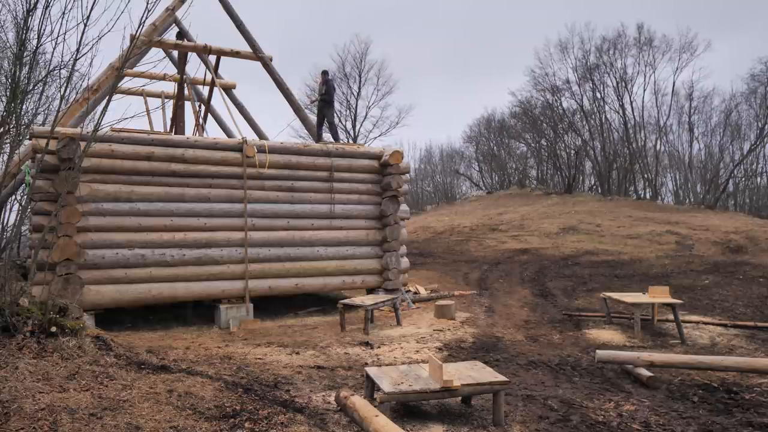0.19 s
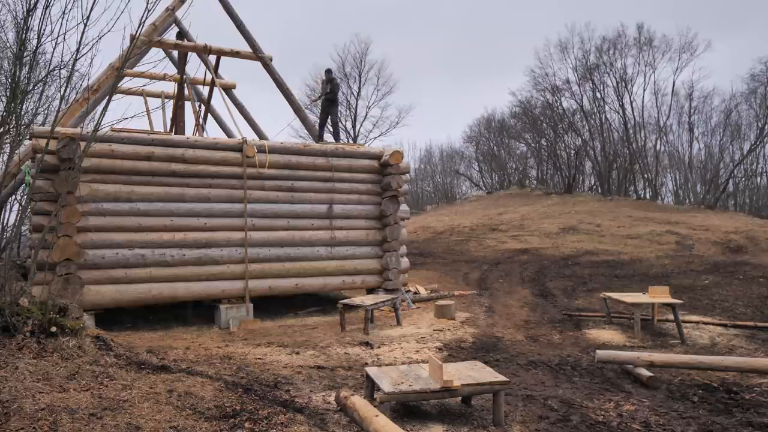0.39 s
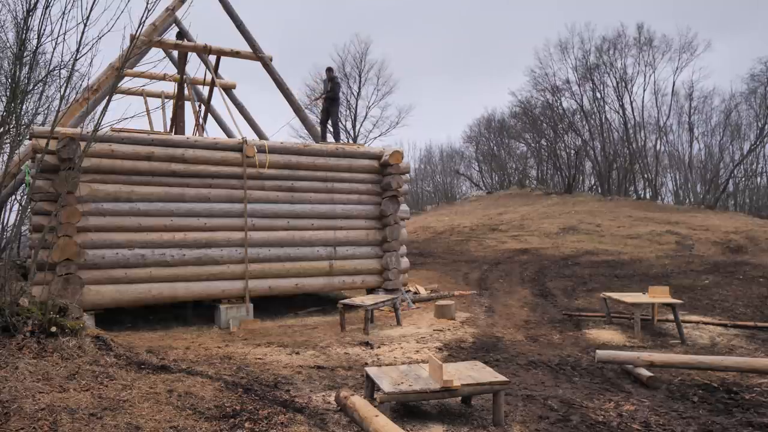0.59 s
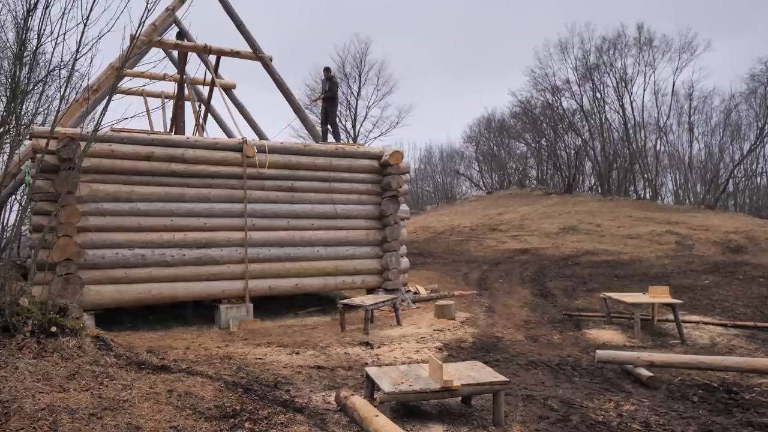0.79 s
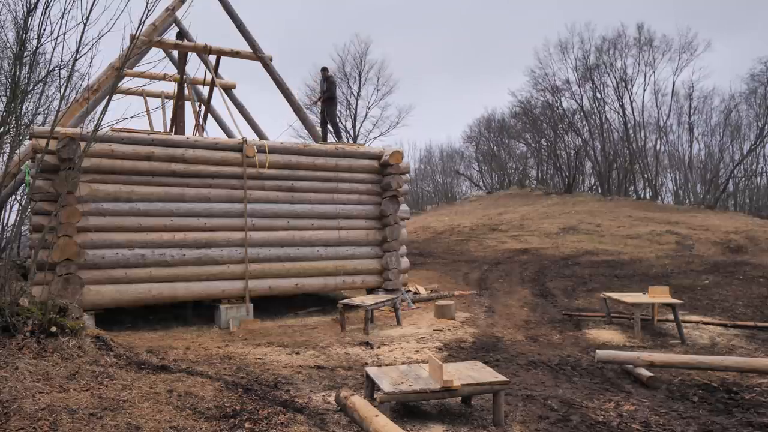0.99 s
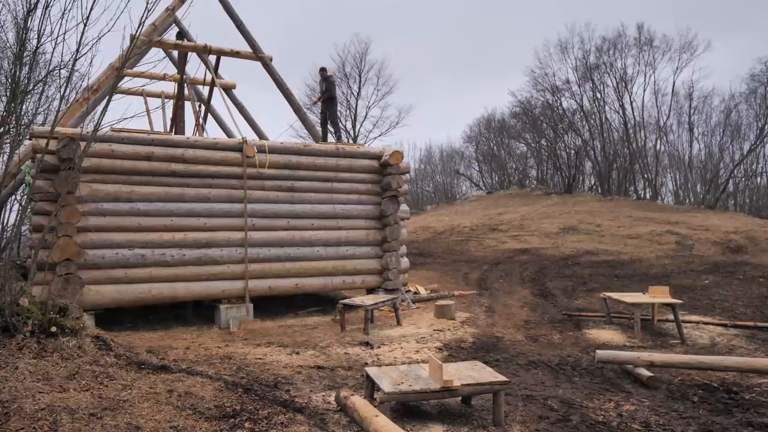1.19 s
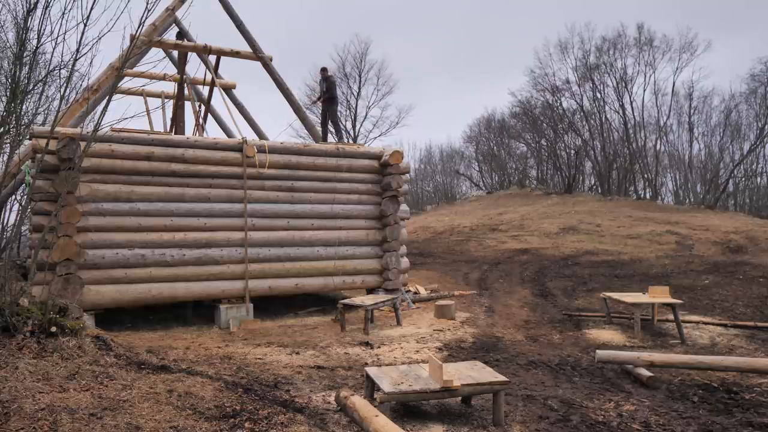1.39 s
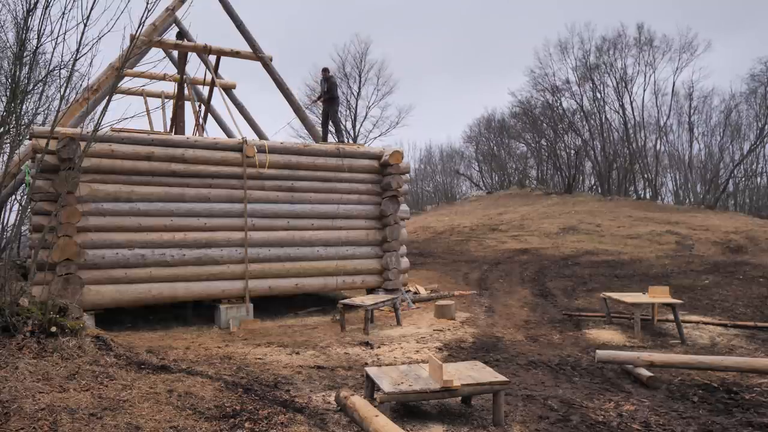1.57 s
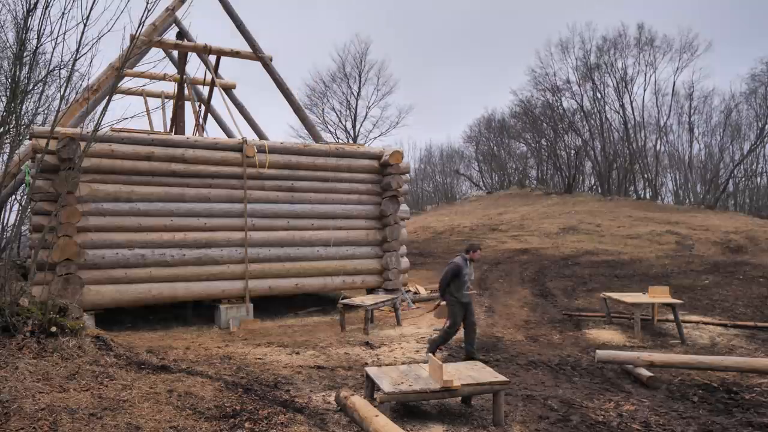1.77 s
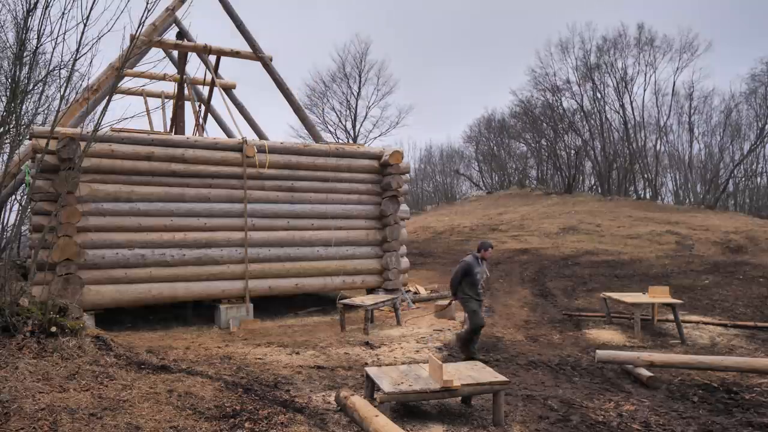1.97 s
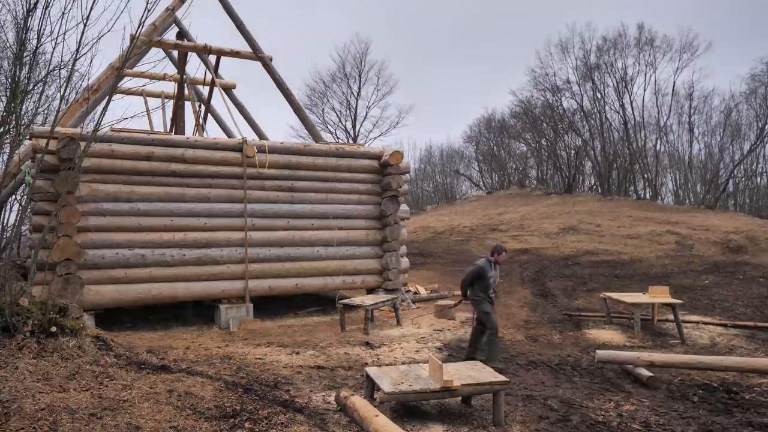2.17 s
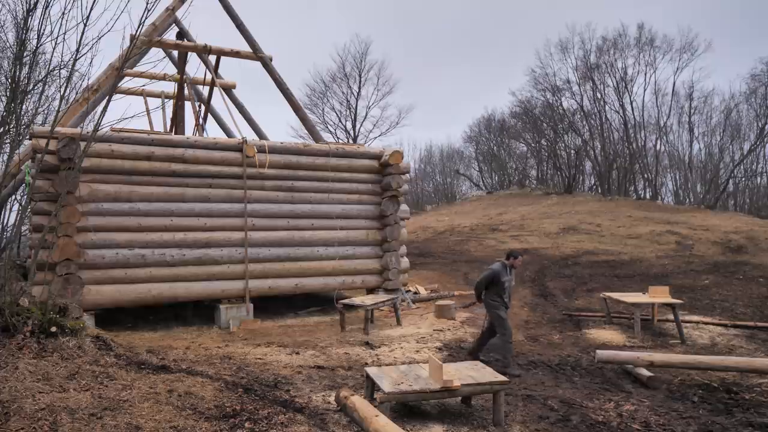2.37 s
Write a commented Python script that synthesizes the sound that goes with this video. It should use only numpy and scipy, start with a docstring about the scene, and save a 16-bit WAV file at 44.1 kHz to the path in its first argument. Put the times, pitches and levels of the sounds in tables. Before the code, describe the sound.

Metal tools dropped and dragged across a wooden workbench outside, sharp clinks fading into small scuffs

```python
"""Steel tools on a wooden bench

Outdoors by a log building, tools are dragged, dropped and knocked about; then sparse ticks and a step.
Noise-driven modes make wood thuds and rumbles, band-passed grains the gritty scrapes, noise bursts the ticks.
Struck modes make the wood tocks, tool clinks and thin ringing hardware; air noise and a dull echo surround them."""
import sys
import numpy as np
from scipy import signal
from scipy.fft import rfft, irfft
from scipy.io import wavfile

SR = 44100
rng = np.random.default_rng(int(sys.argv[2]) if len(sys.argv) > 2 else 0)


def log_audio(samples):
    """Write samples as a 16-bit WAV file to the path given in sys.argv[1]."""
    # one column per channel
    frames = np.atleast_2d(samples).T
    # limit to full scale, then quantise
    limited = np.clip(frames, -1, 1)
    pcm = np.round(limited * 32767).astype(np.int16)
    wavfile.write(sys.argv[1], SR, pcm)


def voltage_ratio(decibels):
    """Convert decibels (scalar or array-like) to amplitude ratios, 20 dB per decade."""
    exponent = np.asarray(decibels, float) / 20
    return 10 ** exponent


N = 110250


def unit(x):
    """Scale to rms 1."""
    return x / np.sqrt(np.mean(x ** 2))


def add(out, start_s, x):
    """Mix x in at start_s."""
    i = int(start_s * SR)
    out[i:i + len(x)] += x[:N - i]


def ring(x, hz, t60_s):
    """One decaying mode; a unit impulse rings with peak near 1."""
    pole = np.exp(2j * np.pi * hz / SR - np.log(1000) / (t60_s * SR))
    return signal.lfilter([1], [1, -pole], x).imag


def hum(x, modes):
    """Modes driven by noise of rms 1, each giving its own dB."""
    out = 0
    for hz, db, t60_s in modes:
        noise_gain = np.sqrt(4 * np.log(1000) / (t60_s * SR))
        out = out + voltage_ratio(db) * ring(x, hz, t60_s) * noise_gain
    return out


def shape(start_s, length_s, db, fall_db):
    """Quick attack, steady dB change over the length, then release."""
    attack_s, release_t60_s = 0.0006, 0.031
    t = np.arange(N) / SR - start_s
    fall = fall_db * np.clip(t / length_s, 0, 1)
    release = np.maximum(t - length_s, 0) * 60 / release_t60_s
    return np.clip(t / attack_s, 0, 1) * voltage_ratio(db - fall - release)


def grains(rate_per_s, spread_db):
    """Dense tiny impacts of uneven size, rms 1."""
    hit = rng.random(N) < rate_per_s / SR
    size_db = spread_db * np.minimum(rng.exponential(size=N), 4)
    return unit(hit * rng.standard_normal(N) * voltage_ratio(size_db))


def patches(rate_hz):
    """Gain that wanders unevenly, as a rough surface passes."""
    spread_db = 3
    k = int(N * rate_hz / SR)
    wander = np.interp(np.arange(N), np.arange(k) * N / k, rng.standard_normal(k))
    return voltage_ratio(spread_db * wander)


def band(x, lo_hz, hi_hz, like=None):
    """Band-pass, scaled so that the steady signal `like` (default x) comes out at rms 1."""
    sos = signal.butter(2, [lo_hz, min(hi_hz, SR / 2.4)], "band", fs=SR, output="sos")
    reference = signal.sosfilt(sos, x if like is None else like)
    return signal.sosfilt(sos, x) / np.std(reference)


def air():
    """Open-air background: shaped noise whose octave bands flicker a little."""
    # relative spectrum: f/Hz, density/dB per Hz
    spectrum = [(15, -59), (25, 5.5), (322, 0.5), (1240, -9), (1850, -12.5), (5150, -20), (15500, -23)]
    rms_db, flicker_db = -49, 1
    hz, out = np.arange(N // 2 + 1) * SR / N + 1, 0
    curve_hz, curve_db = np.array(spectrum).T
    tone = voltage_ratio(np.interp(np.log(hz), np.log(curve_hz), curve_db))
    for centre_hz in 30 * 2. ** np.arange(10):
        octave = np.sqrt(np.clip(1 - np.abs(np.log2(hz / centre_hz)), 0, 1))
        noise = irfft(rfft(rng.standard_normal(N)) * tone * octave, N)
        flicker = np.interp(np.arange(N), np.arange(40) * N / 39, rng.standard_normal(40))
        out = out + noise * voltage_ratio(flicker_db * flicker)
    return unit(out) * voltage_ratio(rms_db)


def scrapes():
    """Steel sliding over gritty wood: patchy grains in two bands; brief band-passed scuffs."""
    # slide breakpoints: t/s, level/dB, treble re main band/dB
    slide = [(0, -53, -31), (0.547, -56, -10), (0.553, -37.5, -4), (0.636, -45.5, 8), (0.638, -11, -3),
             (0.67, -35.5, -8), (0.713, -49, 7), (0.744, -27.5, -4.5), (0.804, -45, -7), (.835, -30.5, 7),
             (0.943, -32, 4.5), (0.957, -26, 11.5), (1.003, -16.5, -7.5), (1.022, -31, -22),
             (1.172, -37.5, -12.5), (1.299, -48.5, -20)]
    # brief scuffs: t/s, length/s, level/dB, fall over length/dB, centre f/Hz
    scuffs = [(1.231, 0.0096, -32, 5, 11000), (1.724, 0.015, -63.5, -16.5, 6260),
              (1.822, 0.052, -49, 5, 8750), (2.073, 0.035, -47, -7, 4020), (2.116, 0.068, -42, 8, 2220),
              (2.312, 0.273, -54.5, -3, 2340)]
    span = 1.9  # centre to band edge, ratio
    drive = (grains(14000, 1.5) + 0.54 * rng.standard_normal(N)) * patches(120)
    t, (s, db, treble_db) = np.arange(N) / SR, np.array(slide).T
    treble = voltage_ratio(np.interp(t, s, treble_db)) * band(drive, 4430, 14200)
    out = band(drive, 1710, 9250) + treble
    out *= voltage_ratio(np.interp(t, s, db, right=-99))
    for s, length_s, db, fall_db, hz in scuffs:
        i, j = int(s * SR), int((s + length_s) * SR) + 4000
        scuff = band(drive[i:j], hz / span, hz * span)
        add(out, i / SR, scuff * shape(s, length_s, db, fall_db)[i:j])
    return out


def wood():
    """Chattering contacts shake the bench's modes, which ring on; single knocks tock."""
    # blows and drags: t/s, length/s, level/dB, fall over length/dB, top f/Hz
    thuds = [(.005, 0.1, -41.5, -0.5, 1620), (0.112, 0.11, -31, -0.5, 830), (0.212, 0.064, -20.5, 13, 1810),
             (0.274, 0.13, -14, 36.5, 1490), (0.314, 0.21, -20.5, 18, 1510), (0.546, 0.0525, -32, -4, 2320),
             (0.634, 0.086, -17, 26, 700), (0.718, 0.066, -22.5, 6, 2050), (0.774, 0.19, -30.5, -0.5, 1530),
             (0.858, 0.048, -13.5, 18.5, 1920), (0.97, .035, -19.5, 7, 1540),
             (1.039, 0.099, -27.5, 12, 1620), (1.11, 0.45, -33.5, 49.5, 2270),
             (1.569, 0.031, -29.5, 18.5, 1720), (2.116, 0.064, -44.5, 3.5, 817)]
    # bench modes: f/Hz, level/dB, t60/s
    bench_modes = [(127.4, -9, 0.062), (261.6, -21, 0.54), (378, -16, 0.05), (770, -19.5, 0.031),
                   (1022, -23.5, 0.017)]
    # knocks, each one mode of plank, ground or bit of steel: t/s, peak/dB, f/Hz, t60/s
    tocks = [(.12, -25, 610, 0.23), (.277, -7, 913, 0.084), (.297, -11.5, 965, 0.056),
             (.551, -23.5, 1980, .035), (.860, -5, 790, 0.048), (.578, -17, 1850, .012),
             (.605, -12.5, 764, 0.061), (1.338, -17.5, 4860, 0.014), (2.09, -24.5, 624, 0.014),
             (2.097, -24.5, 235, 0.053), (2.113, -23, 428, 0.023), (.642, -20, 421.7, 0.16),
             (.726, -15, 792, 0.22), (0.97, -27.5, 100.9, 0.31)]
    broad_db, low_cut_hz = -3, 152.6
    drive, out = grains(4500, 1), np.zeros(N)

    def body(x):
        """Bench modes plus dull broadband noise."""
        return hum(x, bench_modes) + voltage_ratio(broad_db) * signal.lfilter([1], [1, -.8], x)

    steady = body(drive[:SR // 2])
    for s, length_s, db, fall_db, top_hz in thuds:
        i, j = int(s * SR), int((s + length_s) * SR) + 8000
        push = (drive * shape(s, length_s, db, fall_db))[i:j]
        add(out, s, band(body(push), low_cut_hz, top_hz, steady))
    impulse = np.r_[1., np.zeros(SR // 3)]
    for s, db, hz, t60_s in tocks:
        add(out, s, voltage_ratio(db) * ring(impulse, hz, t60_s))
    return out


def ticks():
    """Short hard ticks: a noise crack of a few ms and a weaker, longer noise tail."""
    # t/s, level/dB, centre f/Hz
    hits = [(0.1635, -26.5, 5160), (0.2169, -14, 4200), (0.3104, -24.5, 5060), (0.331, -33.5, 6000),
            (0.352, -26, 4960), (0.364, -20, 5100), (0.3879, -12.5, 4030), (0.6062, -0.5, 5500),
            (0.832, -10.5, 7370), (1.3373, -12.5, 5000), (1.5184, -34.5, 7000)]
    crack_t60_s, tail_db, tail_t60_s = .008, -21.5, 0.096
    out, t = np.zeros(N), np.arange(3000) / SR
    for (s, db, hz), hiss in zip(hits, rng.standard_normal((len(hits), 3000))):
        crack = band(hiss, hz / 1.77, hz * 1.88) * voltage_ratio(-60 * t / crack_t60_s)
        tail = band(hiss[::-1], hz / 1.35, hz * 1.62) * voltage_ratio(tail_db - 60 * t / tail_t60_s)
        add(out, s, voltage_ratio(db) * (.5 * crack + tail))
    return out


def clinks():
    """Each blow wakes the steel tool's modes a little differently, until a touch mutes them."""
    # tool modes: f/Hz, level/dB, t60/s
    tool_modes = [(4340, -16, .2), (4860, -3, .08), (7365, -8, .22), (8410, -5, .09), (12140, -5, .07),
                  (13500, -10, .08)]
    # blows: t/s, level/dB, time to mute/s, loss off favoured pitch/dB per octave, favoured f/Hz
    blows = [(0.6058, -2, 0.019, -2.5, 7800), (0.881, 0.5, 0.023, 16, 9900), (0.909, -2.5, 0.011, 20, 8440),
             (0.954, 5, 0.0023, 30.5, 8200), (0.961, -1, 0.0044, 33.5, 7430),
             (1.198, -14.5, 0.011, 55, 7300)]
    mute_t60_s = 0.057
    out, t = np.zeros(N), np.arange(5000) / SR
    mode_offsets_db = rng.standard_normal((len(blows), len(tool_modes)))
    for (s, db, free_s, loss_db, best_hz), offsets_db in zip(blows, mode_offsets_db):
        tone = np.zeros(len(t))
        for (hz, mode_db, t60_s), offset_db in zip(tool_modes, offsets_db):
            gain = voltage_ratio(mode_db + offset_db - loss_db * abs(np.log2(hz / best_hz)))
            tone += gain * ring(t == 0, hz, t60_s) * patches(66)[:len(t)]
        mute = np.maximum(t - free_s, 0) * 60 / mute_t60_s
        add(out, s, .5 * voltage_ratio(db - mute) * tone)
    return out


def pins():
    """Thin hardware nudged and left to ring: lines that waver as the pieces swing, then are muted."""
    # modes of two pieces: f/Hz, level/dB, t60/s
    modes_a, modes_b = [(5265, 0, .6)], [(5044, -1, 1.8), (6029, -1, .7), (8409, -4, .6), (9835, -1, .45)]
    # nudges of each piece: t/s, level/dB, time to mute/s
    pings_a, pings_b = [(1.064, -33, .27), (1.105, -38, .05)], [(1.455, -53, 0.226)]
    attack_s, mute_t60_s = .004, .02
    out, t = np.zeros(N), np.arange(SR // 3) / SR
    for modes, pings in ((modes_a, pings_a), (modes_b, pings_b)):
        for s, db, free_s in pings:
            tone = np.zeros(len(t))
            for hz, mode_db, t60_s in modes:
                waver = patches(68)[:len(t)] ** 2.5
                tone += voltage_ratio(mode_db) * ring(t == 0, hz, t60_s) * waver
            mute = np.maximum(t - free_s, 0) * 60 / mute_t60_s
            add(out, s, voltage_ratio(db - mute) * np.minimum(t / attack_s, 1) * tone)
    return out


def wall_echo(near):
    """Faint dull echo off log wall and trees: convolution with decaying low-passed noise."""
    energy_db, t60_s, delay_s = -18.5, 0.68, .008
    t = np.arange(SR // 2) / SR
    dull = signal.lfilter([1], [1, -.6], rng.standard_normal(len(t)))
    echo = dull * voltage_ratio(-60 * t / t60_s) * (t > delay_s)
    echo *= voltage_ratio(energy_db) / np.sqrt(np.sum(echo ** 2))
    return signal.fftconvolve(near, echo)[:N]


def scene():
    """Near sources, their echo and the open air."""
    near = wood() + scrapes() + ticks() + clinks() + pins()
    return (near + wall_echo(near) + air())[None]


def roll_off(x):
    """The treble ends steeply here."""
    return signal.sosfilt(signal.butter(12, 15680, fs=SR, output="sos"), x)


def record(dry):
    """Microphone drops the deepest bass; peaks beyond full scale clip."""
    low_cut_hz = 60
    thin = signal.sosfilt(signal.butter(2, low_cut_hz, "high", fs=SR, output="sos"), dry)
    return roll_off(np.clip(thin, -1, 1))


dry = scene()
out = record(dry)
log_audio(out)
```